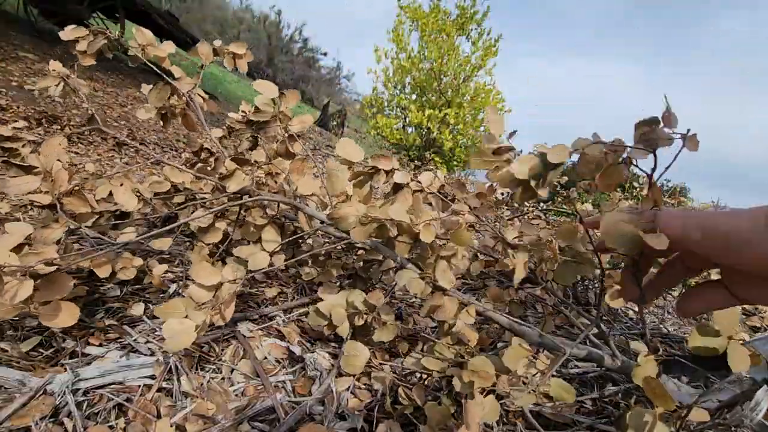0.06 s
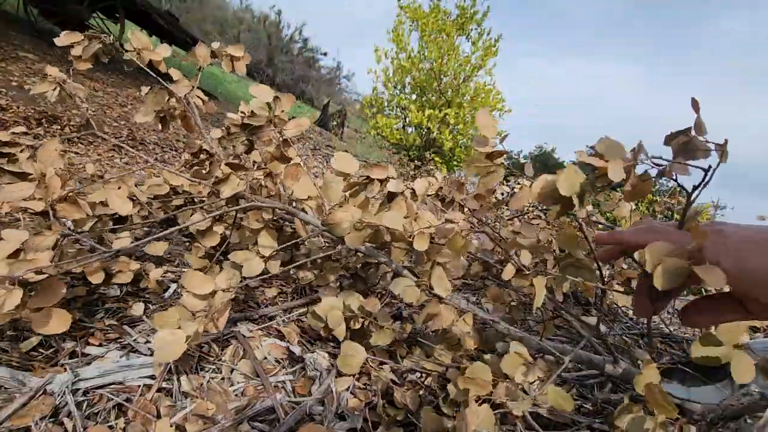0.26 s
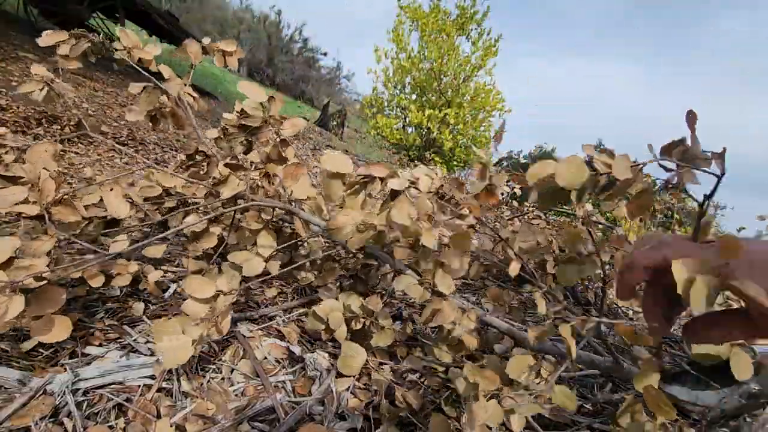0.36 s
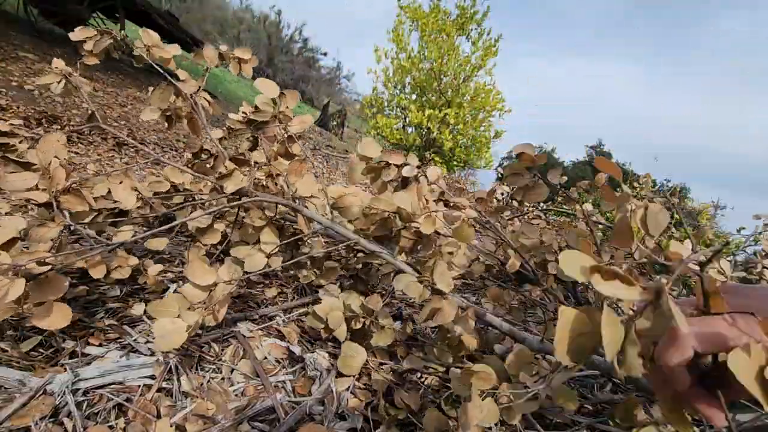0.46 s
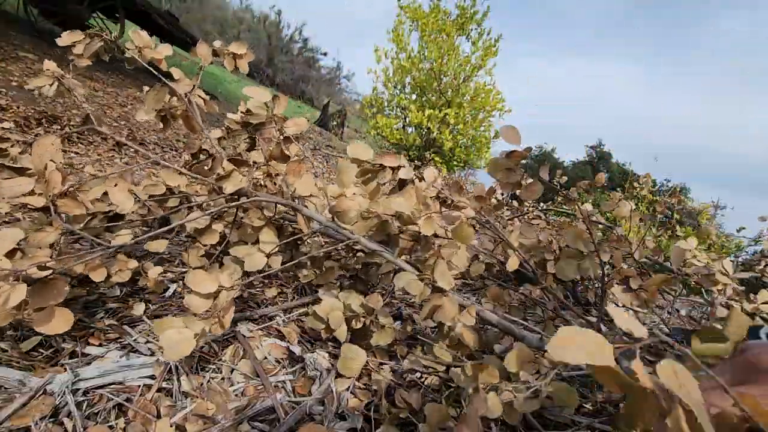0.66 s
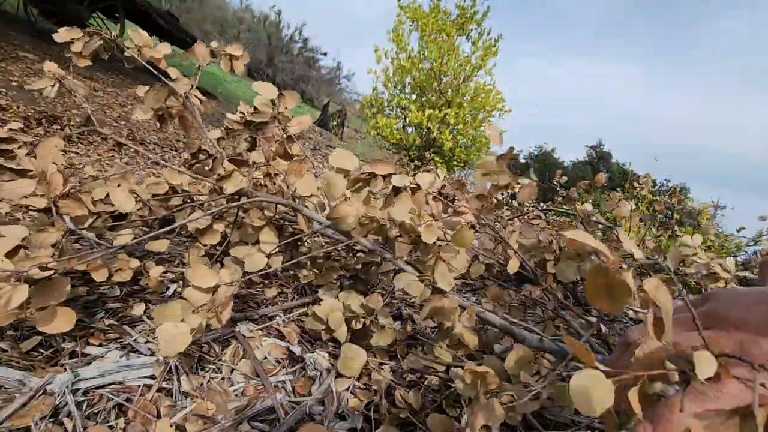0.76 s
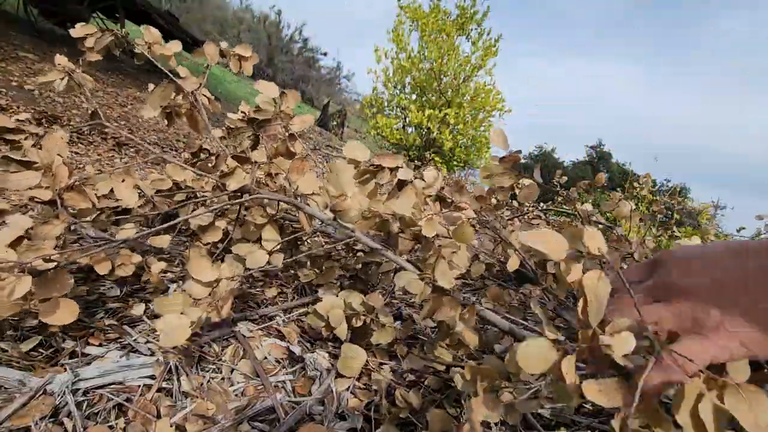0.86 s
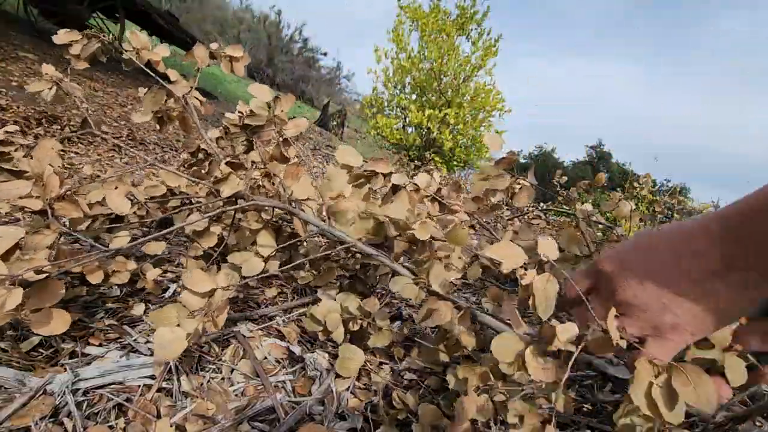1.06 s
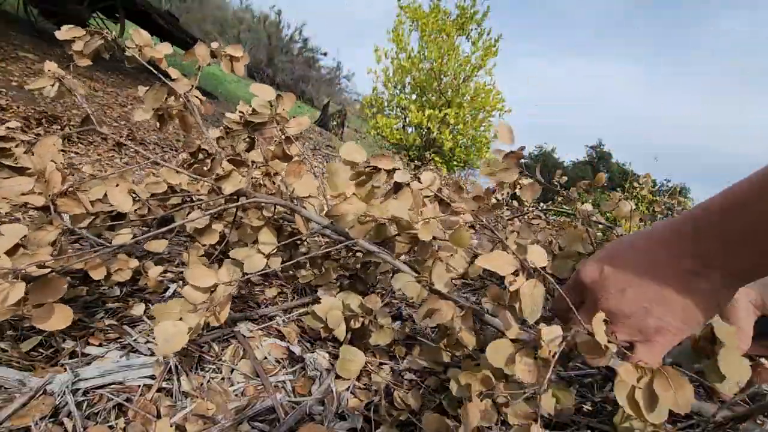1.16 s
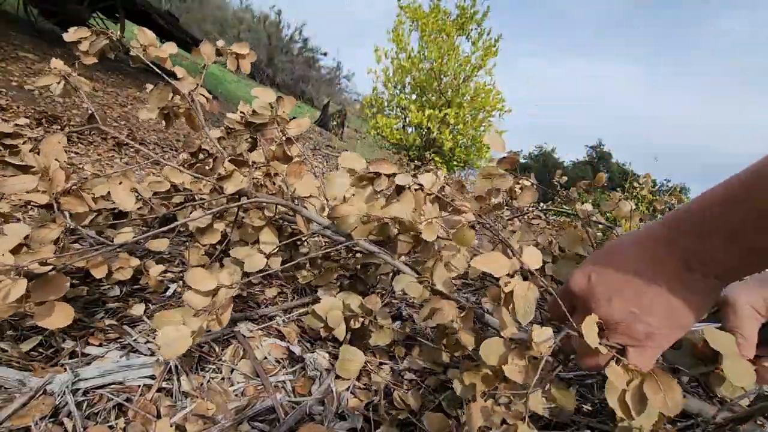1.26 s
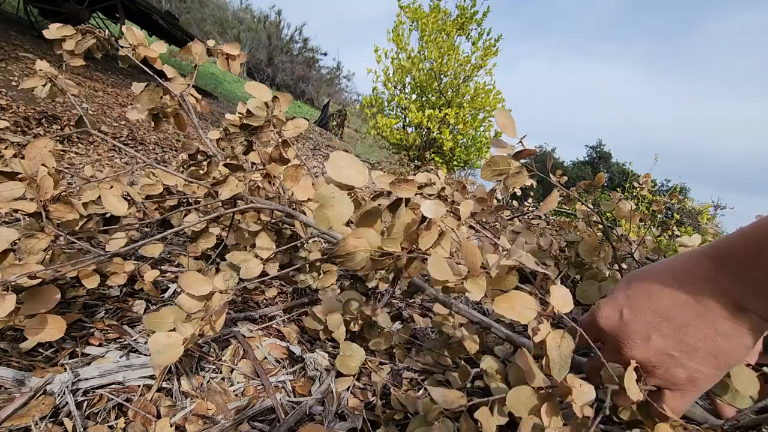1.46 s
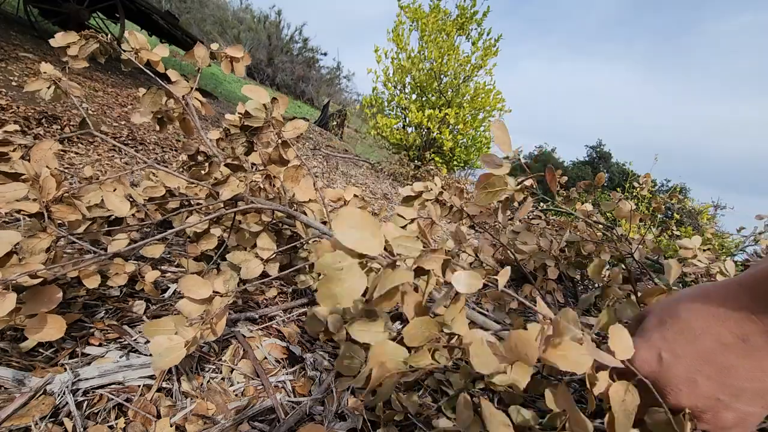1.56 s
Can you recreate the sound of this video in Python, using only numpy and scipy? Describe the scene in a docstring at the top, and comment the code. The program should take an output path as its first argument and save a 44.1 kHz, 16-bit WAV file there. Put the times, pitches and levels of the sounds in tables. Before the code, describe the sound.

Hand pruners at close right give short, high metallic squeaks and sharp snips, first early, then again later, while dry leaves rustle and twigs crackle; quiet open yard, faint low rumble, close stereo microphone.

```python
"""The blades of hand pruners squeal by stick-slip as they slide shut, to the right of a small stereo camera:
gliding sines with separately swelling partials. Twigs and leaves crack in sprays of filtered clicks, handles
and wood knock as decaying sines, a parting branch creaks through its modes and twigs ping. Dry leaves rustle
all round as grains over hiss; shaped-noise rumble and low-pitched puffs of wind lie under it."""
import sys
import numpy as np
from scipy import signal
from scipy.fft import rfft, irfft
from scipy.io import wavfile
from scipy.ndimage import uniform_filter1d

SR = 44100
rng = np.random.default_rng(int(sys.argv[2]) if len(sys.argv) > 2 else 0)


def waveform_to_disk(signal):
    """Save audio, clipped to [-1, 1], as 16-bit WAV at the path in sys.argv[1]."""
    frames = np.transpose(np.atleast_2d(signal))
    scaled = np.clip(frames, -1, 1) * 32767
    samples = np.round(scaled).astype(np.int16)
    wavfile.write(sys.argv[1], SR, samples)


def voltage_ratio(decibels):
    """Convert decibels (scalar or array-like) to amplitude ratios, 20 dB per decade."""
    exponent = np.asarray(decibels, float) / 20
    return 10 ** exponent


N = 70560  # samples, 1.6 s
T = np.arange(N) / SR  # time in s

# Rumble spectrum: frequency_hz, relative level_db
RUMBLE_SPECTRUM = [(12, 5), (20, -8), (43, -4.5), (119, -6.5), (177, -11), (193, -20.5), (222, -12.5),
                   (256, -38), (302, -37), (420, -32.5), (550, -48), (920, -120)]
# Wind puffs on the microphones: centre_s, length_ms, frequency_hz, peak level_db, left_minus_right_db
WIND_PUFFS = [(.025, 60, 45, -50, 3), (.13, 50, 112, -49, 0), (.59, 30, 100, -50, 0), (.83, 40, 55, -48, 3),
              (.86, 40, 45, -48, 3), (.98, 30, 150, -52, 0), (1.148, 45, 52, -38, 4)]
# Course of the leaf rustle: time_s, relative level_db
RUSTLE_LEVEL = [(0, -52), (.05, -56), (.1, -57), (.17, -54.5), (.245, -60), (.262, -58.5), (0.281, -67),
                (.3, -50.5), (0.366, -58.5), (0.409, -47.5), (.49, -58), (.56, -59), (.6, -50.5),
                (.628, -54), (.655, -59), (.7, -56), (.725, -64), (.74, -71), (.79, -65.5), (.825, -64),
                (.85, -63.5), (.91, -61.5), (.94, -65), (1.05, -60.5), (1.14, -55), (1.18, -54),
                (1.235, -59.5), (1.254, -64.5), (1.32, -59.5), (1.42, -66), (1.478, -53.5), (1.55, -55),
                (1.6, -50)]
# Spectrum of the leaf rustle: frequency_hz, relative level_db
RUSTLE_SPECTRUM = [(150, -14), (250, 2), (437, -10.5), (642, -2.5), (700, -6), (1380, -2.5), (3030, -5.5),
                   (7520, -2), (14100, -7.5), (16200, -7)]
# Cracks of twigs and leaves: start_s, relative level_db, length_ms, relative body_db,
# left_minus_right_db, left_late_ms
TWIG_CRACKS = [(.086, -46, 4.9, -10, -6, 0.012), (0.0911, -32, 2.04, -41, 1, 0.014),
               (0.1276, -42.5, 6.1, -9, -4, 0.21), (0.135, -40, 8.3, 1, -2, 0.19),
               (.285, -34.5, 7.5, -11, -4, 0.24), (0.2956, -38.5, 5.9, -7, -3, .15),
               (.301, -46, 6.7, -5, -5.5, 0.18), (.3316, -41.5, 5.8, -23, -1, 0.046),
               (.3945, -22.5, 2.36, -5.5, -4.5, 0.338), (0.4181, -38, 5.6, -9, -4, -0.014),
               (.454, -49, 6.6, -11, -1, -0.03), (.460, -50.5, 8, 0, 0, 0.0037),
               (0.5744, -48.5, 8.6, -9, -8.5, 0.054), (0.5942, -46.5, 9.6, -3, -5, 0.3),
               (.618, -47.5, 9.4, -7, -2, 0.205), (.816, -53.5, 12, -9, -3, 0.2),
               (0.8706, -43.5, 4.1, -34, -2.5, 0.18), (1.005, -50, 7.9, 1, -1.5, 0.12),
               (1.0635, -47.5, 4.4, -4, -1, .05), (1.159, -29.5, 7.5, -18.5, -6, 0.22),
               (1.176, -53, 2.6, 2, 12, 0.23), (1.3053, -51, 5.4, -15, 5, -0.0058),
               (1.3494, -57.5, 11, -20, -6, 0.09), (1.3875, -53.5, 4.8, -3.5, 2, 0.0097),
               (1.4504, -52.5, 9.4, 3.5, 6, 0.045), (1.4711, -39.5, 2.7, -21, 7.5, -0.21),
               (1.505, -54.5, 8, -0.5, 2, 0), (1.5662, -51, 6, -21, -12, 0), (1.581, -53, 4.6, -10, -10, 0)]
# Stick-slip squeals of three partials, at the right microphone:
# time_s, pitch_hz, then the rms level_db of partials 1, 2 and 3
LONG_SQUEAL = [(.15, 4550, -62, -80, -80), (.158, 4600, -48, -72, -72), (.166, 4600, -39, -66, -62),
               (.175, 4680, -36, -58, -54), (.184, 4830, -35, -46, -45), (.194, 4710, -36, -47, -48),
               (.202, 4590, -36, -54, -56), (.207, 4450, -31, -56, -44), (.212, 4480, -27, -57, -44),
               (.216, 4570, -33, -60, -56), (.226, 4650, -34, -56, -48), (.238, 4610, -36, -58, -51),
               (.243, 4570, -33, -54, -53), (.2465, 4600, -28, -52, -49), (.25, 4590, -37, -53, -52),
               (.258, 4620, -50, -64, -66), (.264, 4600, -62, -80, -80)]
SHORT_SQUEAL = [(.294, 5000, -55, -70, -66), (.297, 4940, -37, -62, -56), (.301, 4900, -33, -62, -51),
                (.305, 5010, -36, -64, -44), (.309, 5130, -44, -70, -62), (.316, 5150, -51, -75, -70),
                (.322, 5100, -62, -80, -75)]
# The same with two partials: time_s, pitch_hz, level_db of partial 1, level_db of partial 2
CUT_SQUEAL = [(1.1105, 4400, -62, -75), (1.113, 4470, -35, -63), (1.12, 4530, -31, -48),
              (1.128, 4640, -28, -45), (1.136, 4540, -30, -46), (1.143, 4500, -27, -48),
              (1.147, 4400, -23, -52), (1.153, 4420, -26, -60), (1.158, 4460, -23, -54),
              (1.161, 4700, -18, -37), (1.163, 4710, -13, -31), (1.165, 4680, -18, -31),
              (1.167, 4760, -30, -47), (1.171, 4850, -35, -56), (1.176, 4800, -47, -62),
              (1.185, 4900, -60, -75)]
# Squeals of a single partial: time_s, pitch_hz, rms level_db at the right microphone
HIGH_SQUEAL = [(.374, 15500, -59), (.379, 15600, -41), (.384, 15550, -33), (.388, 15480, -24),
               (.3902, 15500, -27), (.392, 15500, -11), (.3934, 15480, -3.5), (.39395, 15200, -6),
               (.3943, 14800, -24), (.3955, 15500, -27), (.397, 15500, -22), (.4, 15560, -31),
               (.403, 15570, -48), (.407, 15430, -47), (.416, 15380, -50), (.42, 15380, -62)]
FAINT_SQUEAL = [(0.606, 7190.0, -61), (0.612, 7360.0, -65), (0.62, 7200, -42.5), (0.624, 7030, -55),
                (0.627, 7060, -59), (0.636, 7160, -59), (0.64, 7100, -57), (0.646, 6950, -50.5),
                (0.656, 7000, -64), (0.662, 7200, -73)]
BLADE_SQUEAL = [(1.111, 13210, -67), (1.115, 13240, -44), (1.12, 13290, -56), (1.134, 13640, -55),
                (1.143, 13390, -41), (1.147, 13210, -28), (1.153, 13250, -27), (1.159, 13300, -22),
                (1.162, 13120, -20), (1.1645, 13120, -17), (1.167, 13170, -36), (1.172, 13160, -44),
                (1.177, 13390, -61), (1.185, 13100, -55), (1.19, 13310, -63)]
# Position of each squeal, in the order long, short, cut, high, faint, blade:
# left_minus_right_db, left_late_ms
SQUEAL_POSITIONS = [(-7.5, .283), (-9, .305), (-9.5, .27), (-13, .26), (-1.5, .17), (-8, .28)]
# Dull knocks of handles and wood: start_s, frequency_hz, rms level_db at onset, t60_ms
DULL_KNOCKS = [(.287, 394, -52, 73), (.297, 163, -48, 72), (.393, 199, -42.5, 56), (.394, 450, -44, 23.3),
               (.395, 687, -40.5, 29), (1.159, 364, -54.5, 93)]
# Creak of the parting branch: time_s, rms level_db
CREAK_LEVEL = [(.377, -60), (.381, -45), (.386, -37), (.391, -38), (.394, -31), (.396, -27), (.399, -39),
               (.404, -51)]
# Modes of the branch: frequency_hz, width_hz of the narrower of two resonators, relative level_db
BRANCH_MODES = [(1850, 200, 0), (2200, 200, 0), (3300, 600, -4), (4100, 500, 0), (5200, 500, -6),
                (7400, 600, -8)]
# Pings of twig on twig: centre_s, frequency_hz, peak level_db at the right (as rms), length_ms
TWIG_PINGS = [(.635, 2220, -56, 12), (1.262, 4500, -59, 12), (1.367, 2150, -60, 10), (1.507, 1300, -57, 8)]


def unit(x):
    """Normalization: divide a signal by its rms value."""
    return x / np.sqrt(np.mean(x ** 2) + 1e-30)


def colour(x, table):
    """Spectral shaping: a gain interpolated in dB over log frequency, -70 dB outside the table."""
    hz, db = np.array(table, float).T
    f = np.maximum(np.arange(N // 2 + 1) * SR / N, 1)
    gain_db = np.interp(np.log(f), np.log(hz), db, left=-70, right=-70)
    return irfft(rfft(x) * voltage_ratio(gain_db), N)


def band(x, hz, width_hz):
    """Resonance: a two-pole filter with gain 1 at its centre."""
    return signal.lfilter(*signal.iirpeak(hz, hz / width_hz, fs=SR), x)


def place(x, pan_db, late_ms):
    """Stereo localization: the left differs from the right in level and in arrival time."""
    n = len(x)
    f = np.arange(n // 2 + 1) / n * SR
    late = irfft(rfft(x) * np.exp(-2j * np.pi * f * late_ms / 1000), n)
    return np.array([late * voltage_ratio(pan_db), x])


def walk(rate):
    """Random modulation: noise averaged twice over 1 / rate seconds, spread 1."""
    size = max(int(SR / rate), 1)
    once = uniform_filter1d(rng.standard_normal(N), size, mode="wrap")
    return unit(uniform_filter1d(once, size, mode="wrap"))


def clicks(n, per_s, scatter_db):
    """Shot noise: impulses at random times, of random sign, most small and a few large."""
    chance, sign, size = rng.random((3, n))
    return (chance < per_s / SR) * np.sign(sign - .5) * voltage_ratio(-scatter_db * np.log(size + 1e-4))


def rumble():
    """Low-frequency noise, nearly coherent between the two sides."""
    mid, side = unit(colour(rng.standard_normal((2, N)), RUMBLE_SPECTRUM))
    halves = np.array([[.5], [-.5]])
    stereo = mid + voltage_ratio(-13.5) * side * np.array([[1], [-1]])
    return voltage_ratio(-52.5) * stereo * voltage_ratio(halves * -0.5)  # left 0.5 dB weaker


def puffs():
    """Wind pressure on the microphones: low sines of random phase under Gaussian envelopes."""
    halves = np.array([[.5], [-.5]])
    out = 0
    for s, ms, hz, db, pan_db in WIND_PUFFS:
        phase = 2 * np.pi * hz * (T - s) + rng.random() * 2 * np.pi
        puff = np.exp(-((T - s) * 2000 / ms) ** 2) * np.sin(phase)
        out = out + np.sqrt(2) * puff * voltage_ratio(db + halves * pan_db)
    return out


def patchy(x):
    """Independent band modulation: each stretch of the spectrum swells and fades on its own."""
    edges = 250 * 2 ** np.arange(0, 6.6, .5)  # half octaves from 250 Hz
    spec, f = rfft(x), np.arange(N // 2 + 1) * SR / N
    out = 0
    for lo, hi in zip([0, *edges[:-1]], edges):
        swell = voltage_ratio(1.5 * walk(36))
        out = out + swell * irfft(spec * ((f >= lo) & (f < hi)), N)
    return out


def leaves():
    """Superposition of many small contacts: crisp grains from five directions over a flickering hiss."""
    grains_per_s, grain_scatter_db = 8000, 2.8
    grain_flicker_db, hiss_flicker_db, hiss_db = 3.6, 1.8, -2.5
    crisp = 0
    for late_ms, hz in ((-.25, 9000), (-.05, 2940), (.08, 12100), (.2, 5800), (.3, 1500)):
        flicker = voltage_ratio(grain_flicker_db * walk(61))
        grains = flicker * unit(clicks(N, grains_per_s / 5, grain_scatter_db))
        crisp = crisp + place(0.94 * grains + band(grains, hz, hz), -6 * late_ms, late_ms)
    noise = rng.standard_normal((3, N))
    low = signal.lfilter(*signal.butter(1, 900, fs=SR), noise)
    # the lows are common to both sides, the highs independent
    hiss = voltage_ratio(hiss_db + hiss_flicker_db * walk(75)) * (noise[:2] - low[:2] + low[2])
    rustle = unit(patchy(colour(unit(crisp) + hiss, RUSTLE_SPECTRUM)))
    s, db = np.array(RUSTLE_LEVEL, float).T
    return rustle * voltage_ratio(np.interp(T, s, db) + 4.5)


def crack_spray(shape):
    """Brittle fracture: a brief burst of clicks with a little noise."""
    n = len(shape)
    burst = clicks(n, 12000, 2.5) + 0.24 * rng.standard_normal(n)
    return shape * unit(burst)


def cracks():
    """Impulsive radiation: bright click sprays, each with a duller body and its own spectral lumps."""
    n, lead_s, body_hz, lumps_db = 2048, .002, 1500, 3.5
    out = np.zeros((2, N + n))
    t = np.arange(n) / SR - lead_s

    def bright(x):
        """Broad resonance of a small fragment."""
        return band(x, 6200, 8200)

    for s, db, ms, body_db, pan_db, late_ms in TWIG_CRACKS:
        # rise in 0.46 ms, half height after about length_ms
        shape = np.clip(t / 0.00046, 0, 1) / (1 + (np.maximum(t, 0) * 1000 / ms) ** 3)
        spray = crack_spray(shape)
        body = band(band(spray, body_hz, 2400), body_hz, 3000)
        shared = place(bright(spray) + voltage_ratio(body_db + 6) * body, pan_db, late_ms)
        separate = np.array([bright(crack_spray(shape)) * voltage_ratio(pan_db), bright(crack_spray(shape))])
        pair = shared + 1.31 * separate
        lumps = np.interp(np.arange(n // 2 + 1), np.linspace(0, n // 2, num=18), rng.standard_normal(18))
        i = int((s - lead_s) * SR)
        out[:, i:i + n] += voltage_ratio(db - pan_db / 2) * irfft(rfft(pair) * voltage_ratio(lumps_db * lumps), n)
    return out[:, :N]


def squeals():
    """Stick-slip of blade on blade: a wavering tone whose harmonic partials swell on their own."""
    tables = [LONG_SQUEAL, SHORT_SQUEAL, CUT_SQUEAL, HIGH_SQUEAL, FAINT_SQUEAL, BLADE_SQUEAL]
    out = 0
    for rows, position in zip(tables, SQUEAL_POSITIONS):
        s, pitch_hz, *levels = np.array(rows, float).T
        hz = np.interp(T, s, pitch_hz) * (1 + .004 * walk(310))
        phase = 2 * np.pi * np.cumsum(hz) / SR
        tone = 0
        for partial, db in enumerate(levels, start=1):
            flutter_db = .8 * (partial + 2) * walk(560)  # higher partials flutter more
            level_db = np.interp(T, s, db, left=-150, right=-150) + flutter_db
            tone = tone + np.sqrt(2) * voltage_ratio(level_db) * np.sin(partial * phase)
        out = out + place(tone, *position)
    return out


def knocks():
    """Damped free vibration: short low sines that decay exponentially."""
    out = 0
    for s, hz, db, t60_ms in DULL_KNOCKS:
        t = np.maximum(T - s, 0)
        out = out + np.sqrt(2) * voltage_ratio(db - 60000 * t / t60_ms) * np.sin(2 * np.pi * hz * t)
    return place(out, 0, 0.44)


def creak():
    """Modal excitation: clicks of parting fibres ring the resonances of the branch."""
    tear = clicks(N, 9000, 1.5)
    ring = 0
    for hz, width_hz, db in BRANCH_MODES:
        mode = band(band(tear, hz, width_hz), hz, width_hz * 2)
        ring = ring + voltage_ratio(db) * unit(mode)
    s, db = np.array(CREAK_LEVEL).T
    level = voltage_ratio(np.interp(T, s, db, left=-150, right=-150))
    return place(level * unit(ring), 0, .35)


def pings():
    """Tone bursts: soft sines of twig on twig under Gaussian envelopes."""
    out = 0
    for s, hz, db, ms in TWIG_PINGS:
        envelope = np.exp(-((T - s) * 2000 / ms) ** 2)
        tone = np.sqrt(2) * voltage_ratio(db) * envelope * np.sin(2 * np.pi * hz * T)
        out = out + place(tone, -0.9, 0.068)
    return out


def scatter(near):
    """Diffuse reflection off ground and brush: convolution with exponentially decaying noise."""
    t60_s, t = .1, T[:8000]
    tail = rng.standard_normal((2, len(t))) * 1000. ** (-t / t60_s) * (t > .002)
    tail = tail / np.sqrt(np.sum(tail ** 2, axis=1, keepdims=True))
    return voltage_ratio(-30) * signal.fftconvolve(near[1:], tail, axes=1)[:, :N]  # fed by the right side


def scene():
    """Linear superposition: near sources and their faint scatter over leaves, rumble and wind."""
    near = cracks() + squeals() + knocks() + creak() + pings()
    return near + scatter(near) + leaves() + rumble() + puffs()


def top_cut(x):
    """Nothing passes above the cut-off."""
    return signal.sosfilt(signal.butter(12, 16960, fs=SR, output="sos"), x)


def record(dry):
    """Band limitation: the camera cuts the top above 16 kHz, without phase shift."""
    low_pass = signal.ellip(8, .2, 30, 16000, fs=SR, output="sos")
    mix = signal.sosfiltfilt(low_pass, dry)
    return top_cut(mix)


dry = scene()
out = record(dry)
waveform_to_disk(out)
```